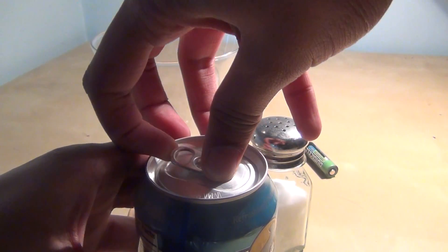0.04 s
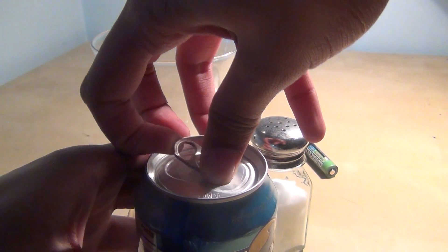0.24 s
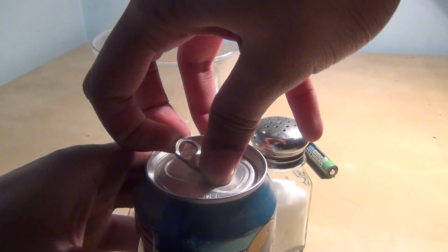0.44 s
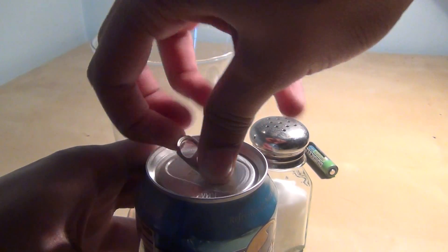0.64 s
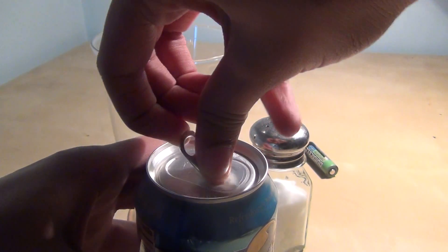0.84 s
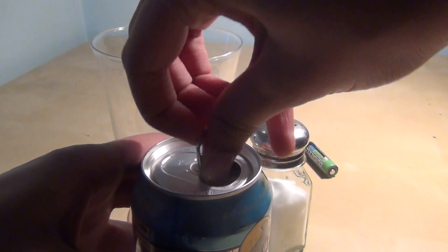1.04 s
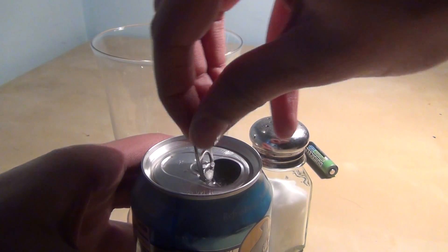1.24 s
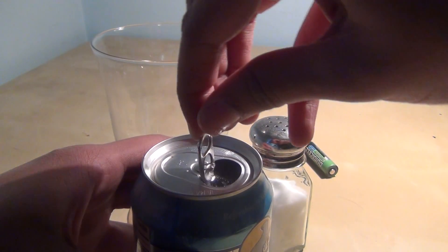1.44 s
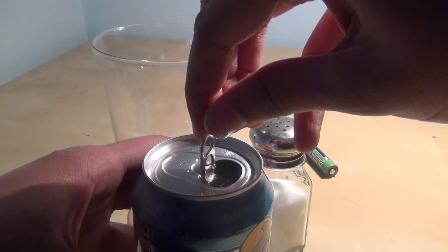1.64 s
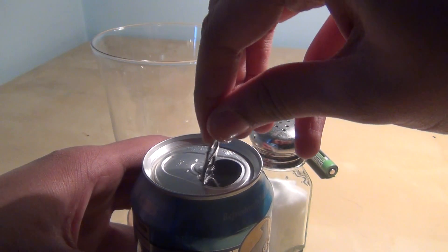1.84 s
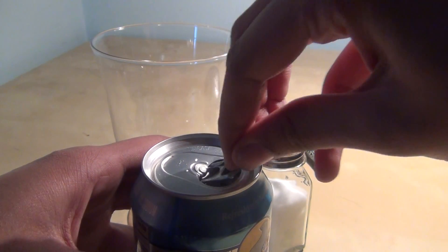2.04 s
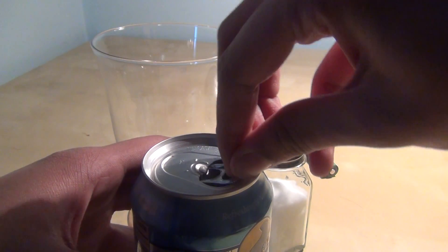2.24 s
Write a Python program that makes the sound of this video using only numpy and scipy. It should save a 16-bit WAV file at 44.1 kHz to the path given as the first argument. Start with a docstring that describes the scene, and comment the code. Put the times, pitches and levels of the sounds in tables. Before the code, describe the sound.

Drink can opening: crisp gas spurt, metallic snap and tearing pop, soft fizzing, small tab clicks

```python
"""Opening a drink can

A drink can is opened on a wooden table in a small room: the seal cracks and gas jets out, the lid's score line
snaps and then tears open with a pop, the drink fizzes, and the tab is bent back. A machine hums faintly.
Metal is slips exciting resonances, gas is shaped noise, fizz is many small bursts over hiss; the table
gives soft falling tones and damped modes, the hum is narrow-band noise, and the room is decaying noise."""
import sys
import numpy as np
from scipy import signal
from scipy.fft import rfft, irfft, next_fast_len
from scipy.io import wavfile
from scipy.ndimage import uniform_filter1d

SR = 44100
rng = np.random.default_rng(int(sys.argv[2]) if len(sys.argv) > 2 else 0)


def generate_wav(sig):
    """Save sig (samples, or channels by samples) to the path in sys.argv[1] as 16-bit PCM at SR."""
    pcm = np.round(np.clip(np.atleast_2d(sig).T, -1, 1) * 32767).astype(np.int16)
    wavfile.write(sys.argv[1], SR, pcm)


def volts(x):
    """Linear amplitude factor 10**(x/20) for a level x in dB, scalar or array-like."""
    e = np.asarray(x, float) / 20
    return 10 ** e


N = 101429  # length in samples


def along(points, hz):
    """Logarithmic frequency scale: interpolates (frequency, value) points along it."""
    f, value = np.transpose(points)
    return np.interp(np.log(hz + 1), np.log(f + 1), value)


def unit(x):
    """Power normalisation: scales to an rms of 1."""
    return x / np.sqrt(np.mean(x ** 2) + 1e-20)


def unit_peak(x):
    """Peak normalisation: scales to a peak of 1."""
    return x / np.abs(x).max()


def envelope(rows):
    """Amplitude envelope: gain per sample, linear in dB between rows, silent outside them."""
    s, db = np.transpose(rows)
    return volts(np.interp(np.arange(N) / SR, s, db, left=-200, right=-200))


def filtered(x, response):
    """Linear filtering: multiplies the spectrum by a complex response of frequency."""
    m = next_fast_len(N + SR // 2)
    return irfft(rfft(x, m) * response(np.fft.rfftfreq(m, 1 / SR)), m)[..., :N]


def resonances(modes):
    """Modal superposition: sums damped resonators of alternating sign."""
    def response(f):
        total = 0
        for k, (centre, width, db) in enumerate(modes):
            total = total + (-1) ** k * volts(db) * 1j * f * width / (centre * centre - f * f + 1j * f * width)
        return total
    return response


def coloured(x, points):
    """Spectral shaping: imposes a spectrum, then an rms of 1."""
    return unit(filtered(x, lambda hz: volts(along(points, hz))))


# likeness of left and right: (frequency [Hz], correlation [-1 to 1])
STEREO_LIKENESS = [(60, 0.99), (500, 0.89), (3770, 0.98), (15000, 0.92)]


def stereo_noise(colour):
    """Interchannel correlation: independent mid and side noises are mixed to the tabled likeness."""
    def mid_side(hz):
        angle = np.arccos(np.clip(along(STEREO_LIKENESS, hz), -1, 1)) / 2
        return volts(along(colour, hz)) * [np.cos(angle), np.sin(angle)]
    mid, side = filtered(rng.standard_normal((2, N)), mid_side)
    return unit(np.array([mid + side, mid - side]))


def sparse(rate, spread_db):
    """Poisson-like impulses: random clicks (rate per second) of uneven size and sign, rms 1."""
    clicks = (rng.random(N) < rate / SR) * rng.choice([-1, 1], N)
    return unit(clicks * volts(spread_db * np.minimum(rng.exponential(size=N), 3)))


def scattered(when, grains):
    """Granular superposition: adds grains at random fractions of the scene, rms 1."""
    length = grains.shape[1]
    places = (when * N).astype(int)[:, None] + np.arange(length)
    return unit(np.bincount(places.ravel(), grains.ravel(), N + length)[:N])


# snaps of lid and tab: (time [s], hollow part peak [dB], lid ring peak [dB], bright part peak [dB],
# lid ring frequency [Hz])
SNAPS = [(0.2448, -31, -14.5, -7, 4100), (0.286, -41, -10.5, -8, 4030), (0.3084, -12.5, -9.5, -30, 3770),
         (0.311, -27, -13.5, -22, 4030), (0.5186, -57, -48, -57, 3660), (0.79, -73, -51, -56.5, 3990),
         (0.8023, -74, -48.5, -52, 3720), (0.832, -49, -36.5, -38.5, 3800), (0.839, -47, -45, -46, 3170),
         (0.85, -44, -31, -43, 3840), (0.8539, -29, -23, -21.5, 3720), (0.8568, -41.5, -26.5, -9, 3380),
         (0.9689, -29, -33, -57, 3400), (0.9738, -24.5, -9, -5, 3480), (0.9911, -22, -36, -5, 3140),
         (0.9964, -27, -49, -5.5, 3320), (1.006, -12, -16.5, -20, 3140), (1.113, -17.5, -18.5, -49, 3380),
         (1.7598, -71, -61, -39, 3180), (1.9516, -39.5, -38.5, -43, 3540), (2.0705, -49, -45, -53, 3420),
         (2.142, -39, -67, -59, 3430), (2.1583, -37, -31.5, -20, 3660)]
# the can while the lid is still shut: (frequency [Hz], width [Hz], relative level [dB])
SHUT_CAN = [(784, 620, -14), (1920, 520, -4.5)]
# air under the opened lid: (frequency [Hz], width [Hz], relative level [dB])
OPEN_CAN_AIR = [(1363, 212, -2.5), (2040, 310, -20)]
# bright edge of the lid: (frequency [Hz], width [Hz], relative level [dB])
LID_EDGE = [(5050, 1200, -6), (8000, 1660, 1), (10330, 6300, -0.5), (13150, 6700, -4.5)]
LID_WIDTH_HZ = 895  # of each of the two equal resonators in series that form the lid ring
OPENS_S = 0.95  # the hollow part changes from shut to open can
SNAP_T60_S, SLIP_SHARE = 0.005, 0.4  # slips within one snap: decay, size over the first blow


def snaps():
    """Impulse response: one blow sounds the air; it and a few dying slips ring the lid and its edge."""
    out, t, hz = np.zeros(N + SR), np.arange(2048) / SR, np.fft.rfftfreq(2048, 1 / SR)
    for s, hollow_db, lid_db, bright_db, lid_hz in SNAPS:
        slips = SLIP_SHARE * rng.standard_normal(len(t)) * volts(-60 * t / SNAP_T60_S)
        slips[0] = 1  # the blow itself
        blows = rfft(slips)
        hollow = resonances(OPEN_CAN_AIR if s > OPENS_S else SHUT_CAN)(hz)
        ring = blows * resonances([(lid_hz, LID_WIDTH_HZ, 0)])(hz) ** 2
        edge = blows * resonances(LID_EDGE)(hz)
        for db, body in ((hollow_db, hollow), (lid_db, ring), (bright_db, edge)):
            out[round(s * SR):][:len(t)] += volts(db) * unit_peak(irfft(body))
    return out[:N]


# lid tearing along its score: (time [s], lid ring level [dB])
TEAR = [(.996, -9.5), (1.003, -28), (1.007, -15.5), (1.012, -30.5), (1.016, -16), (1.03, -21),
        (1.06, -26.5), (1.12, -47.5)]
# the tearing lid: (frequency [Hz], width [Hz], relative level [dB])
TEARING_LID = [(1240, 400, -7), (2824, 270, -2), (3080, 500, -0.5), (3746, 770, -4.5), (5300, 970, -17)]


def tear():
    """Stick-slip excitation: a dense run of slips rings the tearing lid and its bright edge."""
    slips = sparse(1500, spread_db=3.0)
    ring = unit(filtered(slips, resonances(TEARING_LID)))
    edge = unit(filtered(slips, resonances(LID_EDGE)))
    return envelope(TEAR) * (ring + volts(-7) * edge)


# gas through the cracked seal: (time [s], level [dB])
JET = [(.245, -37.5), (.251, -28), (.254, -16.5), (.27, -21), (.288, -15.5), (.301, -15.5), (.307, -40.5),
       (.312, -72)]
# spectrum of that gas: (frequency [Hz], relative density [dB per Hz])
JET_COLOUR = [(250, -58), (550, -19.5), (2200, -21.5), (3970, -14.5), (8300, -5), (13700, -6),
              (16500, -13.5)]
SPIT_SHARE = 0.55  # droplets over the smooth jet, as an rms ratio


def jet():
    """Turbulence noise: a smooth gas stream with spitting droplets, shaped by one spectrum."""
    droplets = sparse(900, spread_db=0.5)
    return envelope(JET) * coloured(rng.standard_normal(N) + SPIT_SHARE * droplets, JET_COLOUR)


# a thin whistle of gas around the jet: (time [s], level [dB])
LEAK = [(.230, -60), (.244, -49.5), (.31, -35), (.47, -73.5)]
# resonance of the leak: (frequency [Hz], width [Hz], relative level [dB])
LEAK_RESONANCE = [(5050, 2000, 0)]


def leak():
    """Resonant turbulence: noise through two equal resonators in series becomes a thin whistle."""
    whistle = filtered(rng.standard_normal(N), lambda f: resonances(LEAK_RESONANCE)(f) ** 2)
    return envelope(LEAK) * unit(whistle)


# a second, weaker escape of gas: (time [s], level [dB])
PUFF = [(.862, -40.5), (.873, -43), (.88, -37), (.91, -47.5), (.95, -62)]
# spectrum of that escape: (frequency [Hz], relative density [dB per Hz])
PUFF_COLOUR = [(250, -14), (2500, -10), (3500, -2), (9500, -4), (16500, -8)]


def puff():
    """Turbulence noise: the weaker escape of gas is a shaped noise burst."""
    return envelope(PUFF) * coloured(rng.standard_normal(N), PUFF_COLOUR)


# finger and tab dragging on the lid: (time [s], length [s], lid ring level [dB], bright part level [dB],
# lid ring frequency [Hz])
RUBS = [(0.539, .024, -75, -68, 3830), (.655, 0.058, -67.5, -76, 3900), (0.692, 0.021, -66, -65, 3700),
        (0.953, 0.013, -45.5, -70, 3380), (0.967, 0.0106, -27, -64, 3584), (1.97, 0.013, -51.5, -56, 3520)]


def rubs():
    """Friction excitation: dense slips swell and stop, heard through the lid's ring and bright edge."""
    out, t = np.zeros(N), np.arange(N) / SR
    for s, length, lid_db, bright_db, lid_hz in RUBS:
        slips = sparse(4000, spread_db=5.5)
        ring = unit(filtered(slips, lambda f: resonances([(lid_hz, LID_WIDTH_HZ, 0)])(f) ** 2))
        edge = unit(filtered(slips, resonances(LID_EDGE)))
        stroke = np.sin(np.pi * np.clip((t - s) / length, 0, 1) ** 1.22)
        out += stroke * (volts(lid_db) * ring + volts(bright_db) * edge)
    return out


# pushes of air and shaking of the table: (time [s], push level [dB], starting frequency [Hz],
# push length [s], shaking level ahead of the table's gain [dB])
THUMPS = [(0.25, -40.5, 69.6, 0.05, -50.5), (0.307, -64, 149.3, .02, -43.5),
          (0.974, -30, 108.7, 0.0033, -46), (0.995, -14.5, 130, 0.0129, -30),
          (1.003, -26, 44.3, 0.026, -39.5), (2.037, -45.5, 122, 0.036, -61.5), (2.166, -40, 130, 0.05, -59)]
# table top modes: (frequency [Hz], width [Hz], relative level [dB])
TABLE_MODES = [(102, 11, 3), (142.7, 12, 5.5), (182.1, 12.5, 7), (236, 65, -5.5), (333.7, 15, -1)]
PUSH_SAG = 0.27  # share of the pitch lost over one push
SHAKE_T60_S, THUMP_SIDE_DB = 0.28, -25.5


def thumps():
    """Damped modes: a soft push of air sags in pitch while the shaken table rings on."""
    push, shake, t = np.zeros(N + SR), np.zeros((2, N + SR)), np.arange(SR // 4) / SR
    for s, db, hz, length, table_db in THUMPS:
        start, u = round(s * SR), np.minimum(t / length, 1)
        tone = np.sin(2 * np.pi * hz * t * (1 - PUSH_SAG * u / 2))
        push[start:][:len(t)] += volts(db) * tone * np.sin(np.pi * np.sqrt(u)) ** 2
        decay = volts(table_db - 60 * t / SHAKE_T60_S)
        shake[:, start:][:, :len(t)] += decay * rng.standard_normal((2, len(t)))
    mid, side = 20 * filtered(shake[:, :N], resonances(TABLE_MODES)) * volts([[0], [THUMP_SIDE_DB]])
    side = side + volts(THUMP_SIDE_DB) * np.roll(push[:N], 90)  # the push leans aside, 2 ms late
    return push[:N] + np.array([mid + side, mid - side])


# ringing of larger bubbles in the can: (centre frequency [Hz])
PLINK_HZ = [3400, 3900, 6150, 7700, 7850]


def plinks():
    """Bubble resonance: larger bubbles ring briefly near the resonances of the can."""
    per_s, decay_cycles = 600, 18  # the ring falls to 5 % over these cycles
    count = int(per_s * N / SR)
    when, stray = rng.random(count), rng.standard_normal(count)
    size = np.minimum(rng.exponential(size=count), 3)
    hz = (rng.choice(PLINK_HZ, count) * np.exp(0.034 * stray))[:, None]
    cycles = hz * np.arange(400) / SR
    shape = np.exp(-3 * cycles / decay_cycles) * (1 - np.exp(-cycles))
    return scattered(when, volts(1.0 * size)[:, None] * np.sin(2 * np.pi * cycles) * shape)


def pops():
    """Resonant noise burst: a cluster of bubbles bursts at once, a tiny rough pop with its own pitch."""
    per_s, centre_hz, spread, t60_s, size_db = 120, 7800, 0.15, 0.006, 3
    count, t, f = int(per_s * N / SR), np.arange(512) / SR, np.fft.rfftfreq(512, 1 / SR)
    when, stray = rng.random(count), rng.standard_normal(count)
    size = np.minimum(rng.exponential(size=count), 3)
    hz = centre_hz * np.exp(spread * stray)[:, None]
    burst = rng.standard_normal((count, len(t))) * volts(-60 * t / t60_s + size_db * size[:, None])
    resonator = 1j * f * hz / 4 / (hz * hz - f * f + 1j * f * hz / 4)  # Q of 4
    return scattered(when, irfft(rfft(burst) * resonator))


def patchy(x):
    """Time-frequency modulation: random soft patches of gain, 1.5 dB rms."""
    z = signal.stft(x, nperseg=512)[2]
    field = uniform_filter1d(rng.standard_normal(z.shape[-2:]), size=16, axis=0)  # over frequency
    field = uniform_filter1d(field, size=6, axis=1)  # over time
    return signal.istft(z * volts(1.5 * unit(field)), nperseg=512)[1][..., :N]


# course of the fizz, ahead of a common gain: (time [s], relative level [dB])
FIZZ = [(1.04, -60.5), (1.176, -54), (2.3, -65)]
# spectrum of small bubbles and foam: (frequency [Hz], relative density [dB per Hz])
FIZZ_COLOUR = [(590, -40), (1000, -18), (1360, 4), (1850, -5.5), (2740, -9.5), (3390, -2), (4200, -5),
               (5540, -7.5), (7200, -2), (7790, 3.5), (8600, -1), (12200, -6), (16500, -20)]


def fizz():
    """Superposed random bursts: bubbles burst inside the can, over the hiss of the foam."""
    small = coloured(sparse(3000, spread_db=4), FIZZ_COLOUR)
    bubbles = small + volts(-4) * plinks() + volts(-5) * pops()
    foam = volts(-1) * stereo_noise(FIZZ_COLOUR)
    return envelope(FIZZ) * volts(1.5) * patchy(bubbles + foam)


# decay of the room: (frequency [Hz], time to fall 60 dB [s])
ROOM_T60 = [(150, 0.58), (1500, 0.27), (10000, 0.14)]


def room(x):
    """Reverberation: table and glass answer at once, the walls after a gap, each frequency dying at its own speed."""
    first_wall_s, walls_db, near_db, near_t60_s, side_db = 0.019, -14, -5.5, 0.05, -22.5
    hz, t, z = signal.stft(rng.standard_normal((2, SR // 2)), SR, nperseg=256)
    walls = signal.istft(z * volts(-60 * t / along(ROOM_T60, hz)[:, None]), SR, nperseg=256)[1]
    walls = walls / np.linalg.norm(walls[0])
    walls = volts(walls_db) * np.pad(walls, ((0, 0), (round(first_wall_s * SR), 0)))
    near = rng.standard_normal(walls.shape) * volts(-60 * np.arange(walls.shape[1]) / SR / near_t60_s)
    near = volts(near_db) * near / np.linalg.norm(near[0])
    mid, side = signal.fftconvolve(x[None], walls + near, axes=1)[:, :N]
    return np.array([mid + volts(side_db) * side, mid - volts(side_db) * side])


# machine hum: (frequency [Hz], width [Hz], level [dB])
HUM = [(130, 2.4, -61.5), (230.2, 25, -64.5)]


def hum():
    """Narrow-band noise: noise through sharp resonators gives a wavering hum."""
    out = np.zeros(N)
    for hz, width, db in HUM:
        out += volts(db) * unit(filtered(rng.standard_normal(N), resonances([(hz, width, 0)])))
    return out


# spectrum of the room tone: (frequency [Hz], relative density [dB per Hz])
ROOM_TONE_COLOUR = [(15, -58.5), (25, -9.5), (60, -8), (110, -8.5), (232, -5.5), (470, -17.5), (878, -13.5),
                    (1900, -24), (3510, -30.5), (4860, -30), (16500, -34)]


def room_tone():
    """Stationary background noise: a steady shaped stereo noise."""
    return volts(-61.5) * stereo_noise(ROOM_TONE_COLOUR)


# off-axis placing of the can: (frequency [Hz], side over mid [dB])
OFF_AXIS = [(60, -42.5), (400, -12), (1500, -26), (5000, -20), (10000, -12), (12000, -50)]


def scene():
    """Linear superposition: the can in its room, a little off the microphone's axis."""
    can = snaps() + rubs() + tear() + leak() + puff() + jet()
    side = filtered(can, lambda hz: 1j * volts(along(OFF_AXIS, hz)))  # a quarter cycle from the mid
    return can + [side, -side] + room(can) + thumps() + fizz() + room_tone() + hum()


def band_limit(x):
    """A steep low-pass at the top of the band."""
    return signal.sosfilt(signal.butter(12, 17870, fs=SR, output="sos"), x)


def record(dry):
    """Dynamic compression: gain control ducks at loud moments and recovers slowly; the top is cut."""
    knee_db, slope, release_s, mic_top_hz = -40, 0.23, 0.97, 16100
    loud_db = 10 * np.log10(np.abs(uniform_filter1d(dry.mean(0) ** 2, size=441)) + 1e-12)  # over 10 ms
    over_db = np.maximum(loud_db - knee_db, 0)
    # each excess is held and dies exponentially until a greater one takes over
    fall = np.arange(N) / SR / release_s
    held_db = np.exp(np.maximum.accumulate(np.log(over_db + 1e-9) + fall) - fall)
    heard = filtered(dry, lambda hz: 1 / np.sqrt(1 + (hz / mic_top_hz) ** 40))
    return band_limit(heard * volts(-slope * held_db))


dry = scene()
out = record(dry)
generate_wav(out)
```